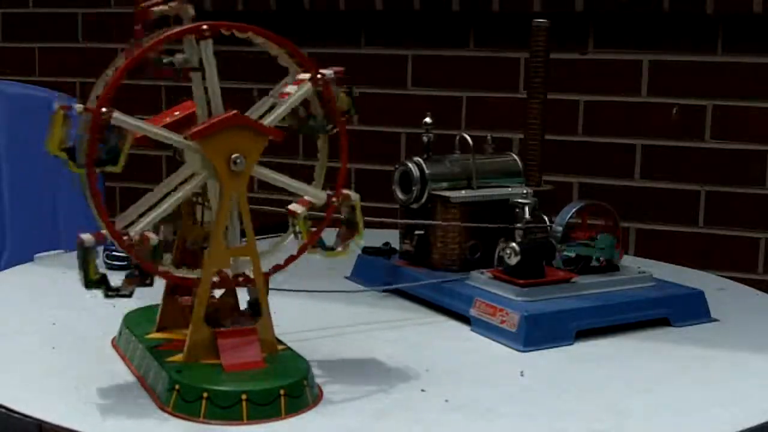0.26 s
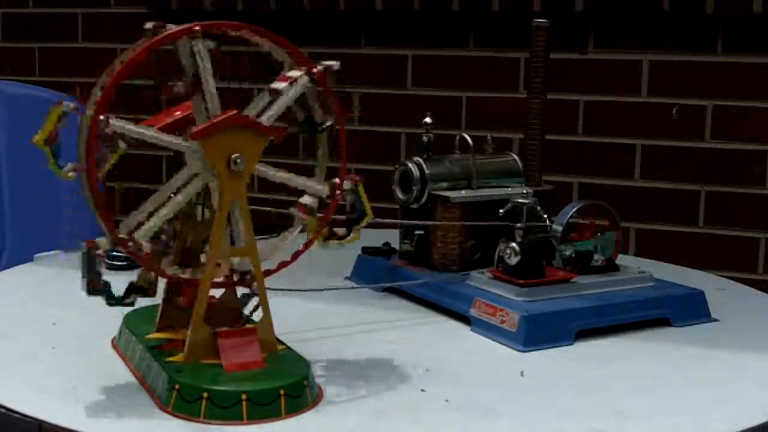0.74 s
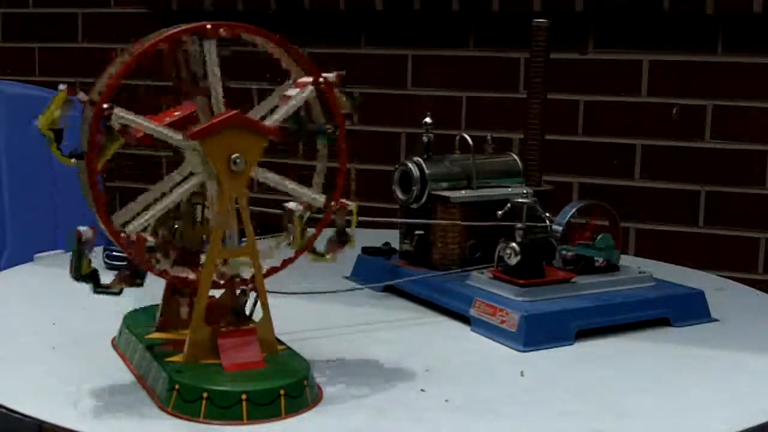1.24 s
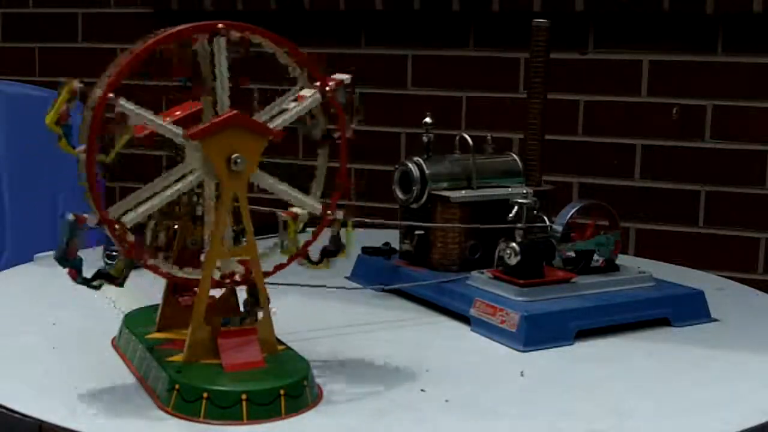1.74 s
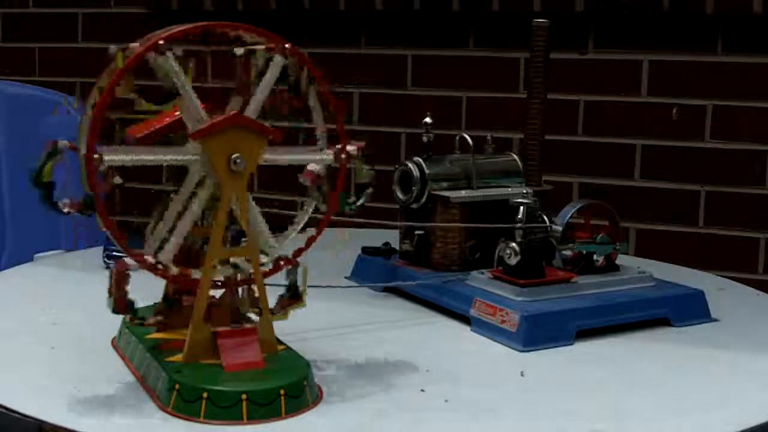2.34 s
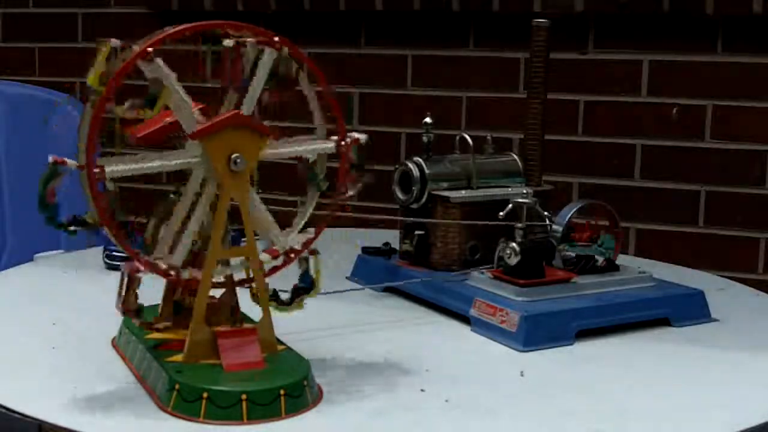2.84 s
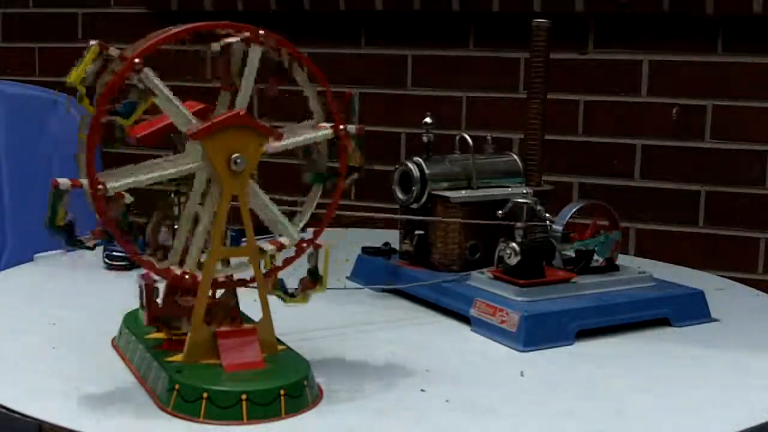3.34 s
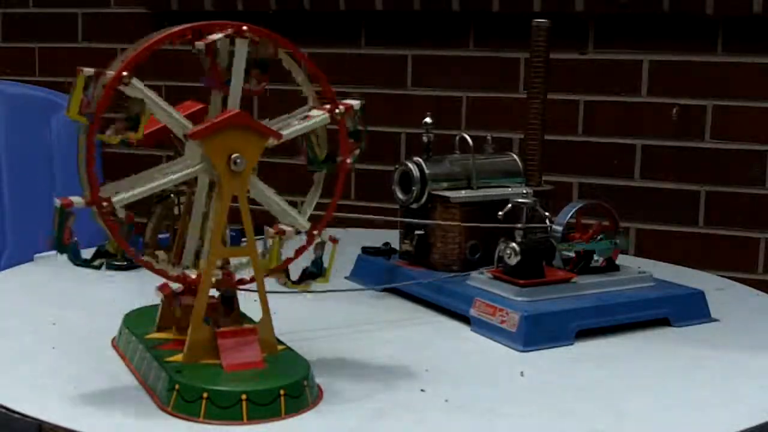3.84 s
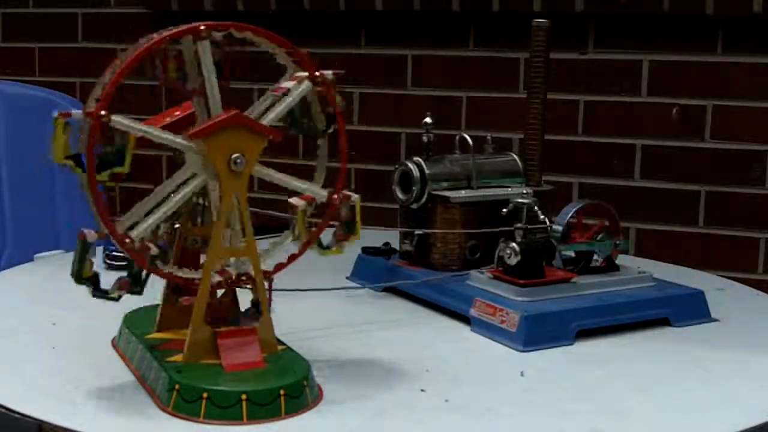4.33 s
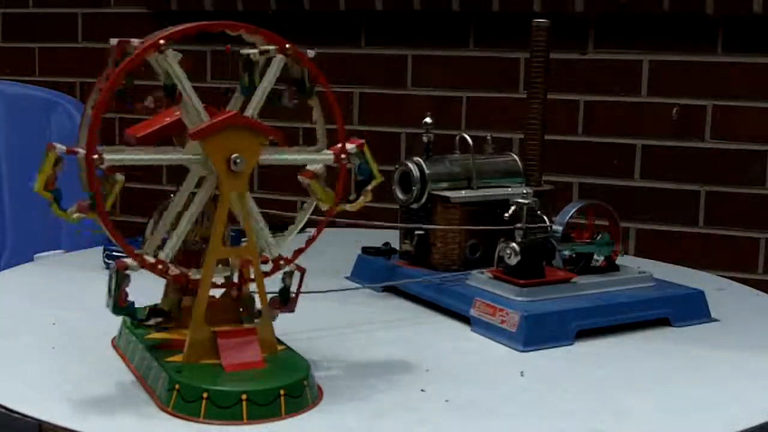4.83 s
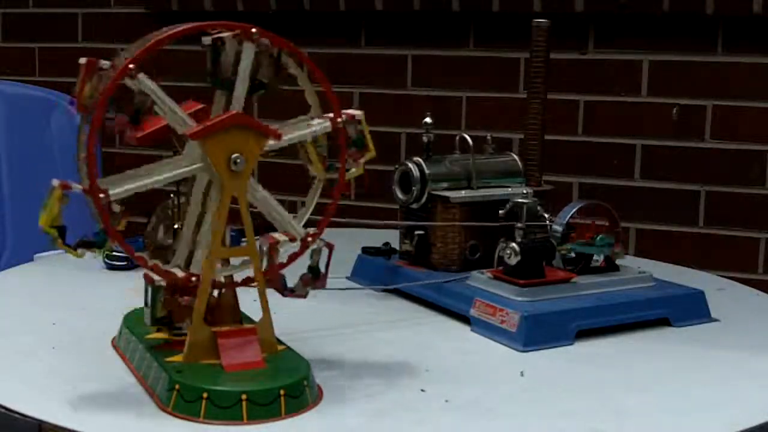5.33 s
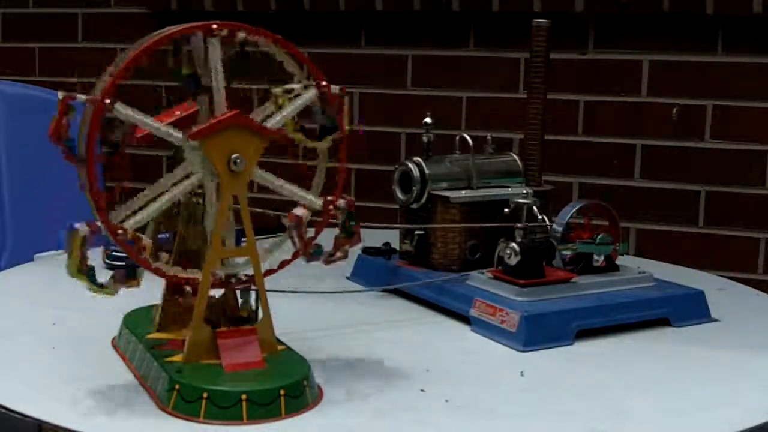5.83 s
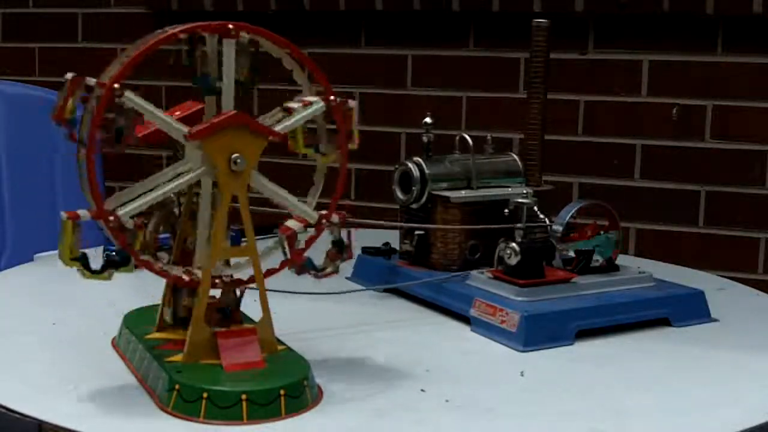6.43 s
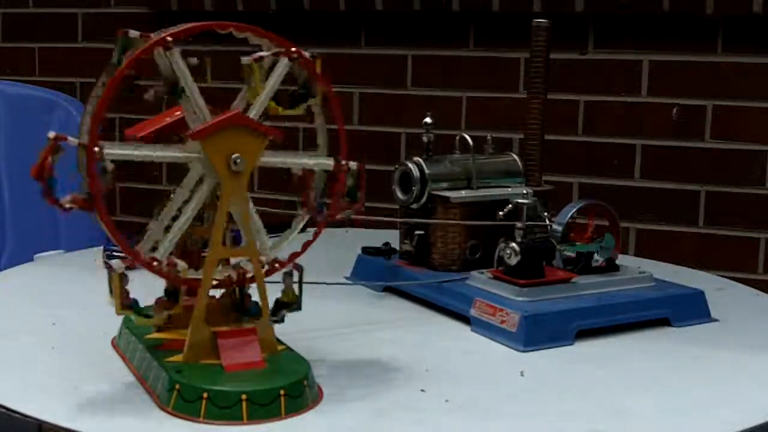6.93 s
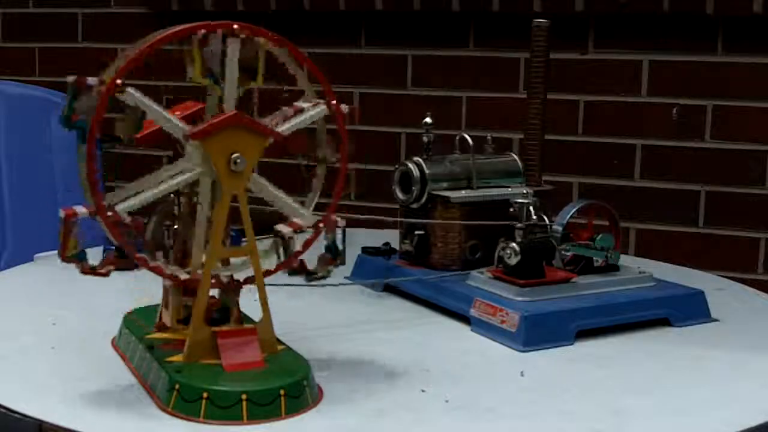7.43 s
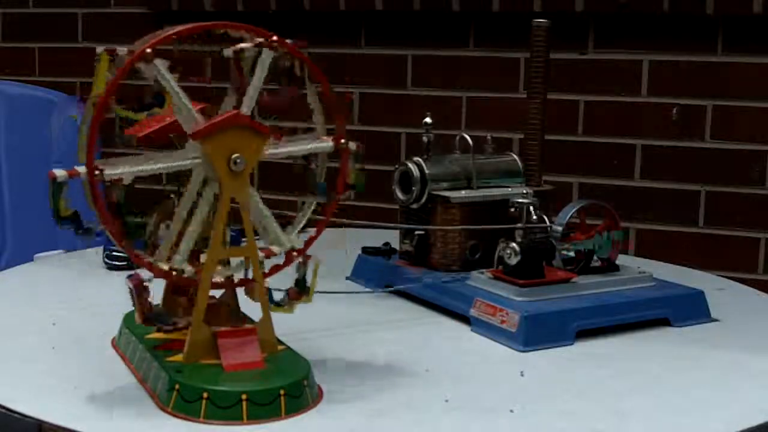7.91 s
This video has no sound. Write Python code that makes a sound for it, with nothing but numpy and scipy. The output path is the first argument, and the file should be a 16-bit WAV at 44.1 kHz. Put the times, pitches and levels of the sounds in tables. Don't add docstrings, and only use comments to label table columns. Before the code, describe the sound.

Close to a small camera on an outdoor table, a toy steam engine turns a tin wheel. A piercing, breathy steam whistle and hiss run throughout, above rapid paired knocks and puffs that gradually slow. Brief dry axle squeaks recur, a bird chirps faintly, and traffic rumbles far away. The background dips whenever the whistle swells; late on, wind thumps the microphone.

```python
import sys
import numpy as np
from scipy import signal
from scipy.fft import rfft, irfft, next_fast_len
from scipy.io import wavfile
from scipy.ndimage import uniform_filter1d, map_coordinates

SR = 44100
rng = np.random.default_rng(int(sys.argv[2]) if len(sys.argv) > 2 else 0)


def wav_out(sig):
    wavfile.write(sys.argv[1], SR, np.round(np.clip(np.atleast_2d(sig).T, -1, 1) * 32767).astype(np.int16))


def makeup_ratio(level_db):
    decades = np.asarray(level_db, float) / 20
    return 10 ** decades


N = 360297
T_S = np.arange(N) / SR


def unit(x):
    return x / np.sqrt(np.mean(np.abs(x) ** 2) + 1e-20)


def along(points, hz):
    f, v = np.transpose(points)
    return np.interp(np.log(hz + 1), np.log(f + 1), v)


def coloured(points):
    return lambda f: makeup_ratio(along(points, f))


def curves(rows):
    t_s, *columns = np.transpose(rows)
    return [np.interp(T_S, t_s, column) for column in columns]


def wobble(rate_hz):
    knots = rng.standard_normal(int(N * rate_hz / SR) + 4)
    return map_coordinates(knots, [np.arange(N) * rate_hz / SR])


def filtered(x, response):
    m = next_fast_len(N + SR // 2)
    return irfft(rfft(x, m) * response(np.fft.rfftfreq(m, 1 / SR)), m)[..., :N]


def modes(table):
    def response(f):
        total = 0
        for k, (centre_hz, width_hz, db) in enumerate(table):
            damping = 1j * f * width_hz
            total = total + (-1) ** k * makeup_ratio(db) * damping / (centre_hz ** 2 - f ** 2 + damping)
        return total
    return response


# f/Hz, correlation [0-1]
LIKENESS = [(25, 1), (60, 0.84), (125, 1), (250, 1), (500, 0.98), (1000, 0.95), (2000, 0.97), (4000, 1)]


def rush(gain):
    def spread(hz):
        turn = np.arccos(np.clip(along(LIKENESS, hz), -1, 1)) / 2
        return gain(hz) * [np.cos(turn), np.sin(turn)]
    mid, side = filtered(rng.standard_normal((2, N)), spread)
    return unit(np.array([mid + side, mid - side]))


def flutter(width_hz):
    re, im = filtered(rng.standard_normal((2, N)), lambda f: 1 / (1 + (f / width_hz) ** 2))
    return unit(re + 1j * im)


# f/Hz, width/Hz, level/dB
REFLECTION_STRIPES = [(6055, 80, -8), (6526, 45, -3), (6670, 60, -4), (6930, 50, -5), (7208, 30, -8), (8600, 60, -6),
                      (8830, 60, -6), (9245, 60, -3)]


def ripple(f):
    return 1 + sum(makeup_ratio(db) / (1 + (2 * (f - c) / width) ** 2) for c, width, db in REFLECTION_STRIPES)


# t/s, f/Hz, purity [0-1], level/dB
NOTE_CURVE = [(0, 6570, .3, -45), (.55, 6575, 0.27, -41.5), (1.3, 6570, 0.33, -44), (1.65, 6620, 0.26, -43),
              (2.1, 6585, 0.3, -44), (3.1, 6600, 0.04, -43.5), (3.5, 6640, 0.17, -43.5),
              (4.1, 6610, 0.13, -44.5), (4.57, 6600, 0.33, -42), (4.72, 6710, 0.4, -43),
              (4.88, 6700, 0.67, -42), (5, 6595, 0.1, -45.5), (5.28, 6545, 0.65, -37),
              (5.4, 6655, 0.9, -42.5), (5.5, 6650, 0.16, -45.5), (6.3, 6660, 0.7, -41.5),
              (6.9, 6660, .5, -43), (7.6, 6680, 0.83, -42)]
# t/s, change/dB
STEAM_SPURTS = [(.04, 3.5), (.48, -0.5), (.57, 2.5), (1.04, 6), (1.12, -3.5), (1.5, 3), (1.57, -6),
                (1.61, 3.5), (1.89, -3.5), (1.98, 7), (2.51, 5), (2.61, -2.5), (2.66, 5.5), (3.03, 9),
                (3.34, -5), (3.72, 3.5), (3.89, 4.5), (3.98, -5.5), (4.66, 5.5), (4.87, -9), (5.37, 5.5),
                (6.42, -6), (6.53, 1), (6.6, -6), (6.67, -1.5), (6.85, -4.5), (7.17, -2), (7.28, -1.5),
                (7.66, 5), (7.72, -6.5)]


def whistle():
    spurt_half_s = .025
    pitch_hz, purity, level_db = curves(NOTE_CURVE)
    purity = np.clip(purity, 0, 1)
    level_db = level_db + sum(db * np.exp(-((T_S - s) / spurt_half_s) ** 2) for s, db in STEAM_SPURTS)
    level_db = level_db + .57 * wobble(14)
    level_db = level_db + 2.2 * (1.1 - purity) * wobble(55)

    locked = flutter(width_hz=48.5)
    locked = unit(locked / np.abs(locked) ** .6)
    swing = np.sqrt(purity) * locked + np.sqrt(1 - purity) * flutter(width_hz=158)
    note = swing * np.exp(2j * np.pi * np.cumsum(pitch_hz) / SR)
    tone = filtered(note.real, ripple)
    tone /= np.sqrt(np.abs(uniform_filter1d(tone ** 2, size=3000)))
    octave = filtered(unit(tone ** 2), lambda f: f > 9000)
    return makeup_ratio(level_db) * tone + makeup_ratio(2 * level_db + 13 * (purity - .5)) * octave


# f/Hz, density/dB per Hz
STEAM_SPECTRUM = [(3350, -66), (5700, -30), (6180, -13), (6430, -8), (6720, -9), (6910, -6), (7110, -9),
                  (8050, -24.5), (9680, -31), (10700, -28), (12200, -35), (13600, -43), (14200, -52),
                  (14500, -64)]


def valve_hiss():
    colour = coloured(STEAM_SPECTRUM)
    return makeup_ratio(17 + 1.03 * wobble(14)) * rush(lambda f: colour(f) * ripple(f))


# f/Hz, density/dB per Hz
LEAK_SPECTRUM = [(2200, -6), (3000, -6.5), (3600, 4.5), (4400, 7.5), (5000, 1), (5600, -21), (7000, -49)]
# t/s, level/dB
LEAK_LEVEL = [(0, 3.5), (2.15, 2.5), (2.4, -0.5), (4.2, -0.5), (4.6, -2.5), (5.2, -0.5), (6, -3.5),
              (8.17, -2)]


def cylinder_leak():
    level_db = curves(LEAK_LEVEL)[0] + 1.55 * wobble(12) + 1.0 * wobble(3.01)
    return makeup_ratio(level_db) * rush(coloured(LEAK_SPECTRUM))


# f/Hz, density/dB per Hz
YARD_SPECTRUM = [(88, -48), (150, -3), (226, -2), (318, -6), (975, -13.5), (1070, -12), (1220, -13.5),
                 (1570, -15), (2040, -14), (3500, -21.5), (4550, -31), (7700, -120)]


def yard_noise():
    return makeup_ratio(6.5 + 1.33 * wobble(25)) * rush(coloured(YARD_SPECTRUM))


# f/Hz, width/Hz, level/dB
HUM_MODES = [(234, 4, 4), (212, 14, -4), (527, 10, -11)]


def machinery_hum():
    return makeup_ratio(-.5) * rush(modes(HUM_MODES))


# f/Hz, density/dB per Hz
TRAFFIC_SPECTRUM = [(35, -19), (55, -8), (75, 0), (85, -3), (97, 0), (130, -5.5), (165, -17.5), (250, -45)]
# t/s, half width/s, change/dB
VEHICLES = [
    (.45, 0.085, 2),
    (2.2, 0.042, -1.5),
    (4.0, 0.08, 4),
    (4.45, 0.26, 5),
    (5.15, 0.43, 4.5),
    (5.9, 0.38, 6),
    (7.0, 0.13, 4.5),
    (7.75, .2, 1.5),
]


def traffic():
    swell_db = sum(db * np.exp(-((T_S - s) / half_s) ** 2) for s, half_s, db in VEHICLES)
    return makeup_ratio(8 + swell_db + 1.2 * wobble(7.1)) * rush(coloured(TRAFFIC_SPECTRUM))


# t/s, level/dB
CAMERA_GAIN = [(.1, -72), (.4, -68), (.65, -71), (1.08, -72), (2.55, -66.5), (3.4, -68), (3.75, -70.5),
               (4.35, -67), (4.8, -70.5), (5.1, -67), (5.33, -71.5), (5.41, -75.5), (5.88, -69), (6.2, -74),
               (7.03, -68.5), (7.25, -72), (7.73, -75), (7.9, -73)]


def camera_gain_db():
    return curves(CAMERA_GAIN)[0]


def background():
    sources = valve_hiss() + cylinder_leak() + yard_noise() + machinery_hum() + traffic()
    return makeup_ratio(camera_gain_db() + .5 * wobble(9)) * sources


# t/s, level/dB
WIND_LEVEL = [(0, -61), (.2, -60), (1.9, -60), (2.2, -56), (4.3, -60.5), (5.1, -59), (5.4, -60.5),
              (7.2, -60.5), (7.4, -49), (7.5, -55), (7.85, -54), (8.1, -63.5)]
# f/Hz, density/dB per Hz
WIND_SPECTRUM = [(5, -9), (12, -7), (25, -2), (45, -6.5), (90, -31), (200, -67)]
# t/s, half width/s, level/dB
GUST_SLAPS = [
    (7.407, .004, -32),
    (7.434, .004, -44),
    (7.448, .004, -39),
    (7.77, .014, -44),
    (7.36, .012, -46),
]


def wind():
    slaps = np.zeros(N)
    for s, half_s, db in GUST_SLAPS:
        u = (T_S - s) / half_s
        slaps -= makeup_ratio(db) * (1 - u ** 2 / 2.2) * np.exp(-u ** 2 / 2)
    buffeting = makeup_ratio(curves(WIND_LEVEL)[0] + .89 * wobble(13)) * rush(coloured(WIND_SPECTRUM))
    return buffeting + slaps * makeup_ratio([[-2.5], [1.5]])


# f/Hz, width/Hz, level/dB
BASE_MODES = [(744, 420, 1), (1050, 240, 3), (1193, 85, 3), (1490, 200, -1.5), (2650, 130, -39)]
# f/Hz, width/Hz, level/dB
CYLINDER_MODES = [(487, 360, -15), (850, 63, 0), (985, 25, 0), (1214, 56, 1.5), (1740, 400, -8),
                  (2077, 120, -2), (2746, 236, -6), (4320, 1000, -16)]
# t/s, change/dB
CRANK_SLACK = [(0, -6), (.3, 7), (.5, 8.5), (.65, -5), (1.05, -5), (1.15, 6.5), (2.05, 5.5), (2.2, -2),
               (8.17, -2.5)]


def piston():
    first_turn_s, turn_s, slowing_s, tiring_s = .061, .10698, 1.185e-4, 1.13e-6
    knock_db, puff_db = (46, 37.5), (14, 18.5)
    knocks, puffs = np.zeros(N + SR), np.zeros(N + SR)
    puff_t = np.arange(SR // 20) / SR
    puff_shape = np.sqrt(puff_t) * np.exp(-puff_t / .008)
    slack_db, = curves(CRANK_SLACK)
    turns = np.arange(68)[:, None] + np.array([0, .435])
    starts_s = first_turn_s + turn_s * turns + slowing_s * turns ** 2 + tiring_s * turns ** 3

    for stroke, s in enumerate(starts_s.ravel()):
        back = stroke % 2
        late, hard, full, bounce = rng.standard_normal(4)
        i = round((s + .0015 * late) * SR)
        blow = makeup_ratio(knock_db[back] + (1 - back) * slack_db[min(i, N - 1)] + .7 * hard)
        knocks[i + 40] += blow
        knocks[i + 40 + round(.0006 * SR * 2 ** bounce)] += .22 * blow
        puff = unit(rng.standard_normal(len(puff_t)) * puff_shape)
        puffs[i:][:len(puff)] += makeup_ratio(puff_db[back] + 1.1 * full) * puff

    sound = filtered(knocks[:N], modes(BASE_MODES)) + filtered(puffs[:N], modes(CYLINDER_MODES))
    return makeup_ratio(camera_gain_db()) * sound


# t/s, length/s, start f/Hz, end f/Hz, level/dB
SQUEAK_NOTES = [(.56, .14, 4220, 4220, -72), (1.02, .085, 4240, 4310, -63), (1.53, .09, 4200, 4215, -67),
                (2.55, .12, 4150, 4230, -65), (3.06, .1, 4250, 4330, -65), (3.51, .2, 4200, 4215, -69),
                (4.57, .21, 4200, 4215, -71), (5.14, .105, 4240, 4310, -65), (5.78, .12, 4200, 4215, -71),
                (6.17, .24, 4120, 4315, -68), (6.95, .1, 4195, 4215, -67), (7.31, .26, 4110, 4315, -69),
                (3.385, .135, 3790, 3320, -67), (4.3, .1, 4480, 4490, -73), (4.02, .08, 4200, 4210, -73)]


def squeaks():
    out = np.zeros(N + SR)
    for s, length_s, start_hz, end_hz, db in SQUEAK_NOTES:
        u = np.linspace(0, 1, round(1.25 * length_s * SR))
        phase = 2 * np.pi * np.cumsum(start_hz + (end_hz - start_hz) * u) / SR
        lateness = 1 + 5 * length_s * (end_hz > start_hz)
        swell = np.sin(np.pi * u ** lateness) ** 2.2
        i = round((s - .1 * length_s) * SR)
        out[i:][:len(u)] += makeup_ratio(db + 2) * swell * np.sin(phase)
    return out[:N] * makeup_ratio(3 * wobble(60))


# delay/ms, signed gain
REFLECTIONS = [(1.514, 0.06), (2.661, -0.04), (2.779, -0.04), (3.076, -0.04), (3.201, -0.04), (3.476, 0.06),
               (3.659, -0.05), (4.188, 0.04), (4.368, -0.06), (4.451, 0.08), (4.568, -0.06), (4.643, 0.04)]


def scene():
    def echoes(f):
        return 1 + sum(1.2 * gain * np.exp(-2j * np.pi * f * ms / 1000) for ms, gain in REFLECTIONS)
    return filtered(whistle() + background() + piston() + squeaks(), echoes) + wind()


def band_limit(x):
    return signal.sosfilt(signal.butter(12, 15030, fs=SR, output="sos"), x)


CONVERTER_OFFSET = [
    [.0129],
    [.0397],
]


def record(dry):
    notch_hz, notch_width_hz, floor_width_hz = 5468, 700, 25

    def port(f):
        gap = notch_hz ** 2 - f ** 2
        return (gap + 1j * f * floor_width_hz) / (gap + 1j * f * notch_width_hz)
    return band_limit(filtered(dry, port) + CONVERTER_OFFSET)


dry = scene()
out = record(dry)
wav_out(out)
```